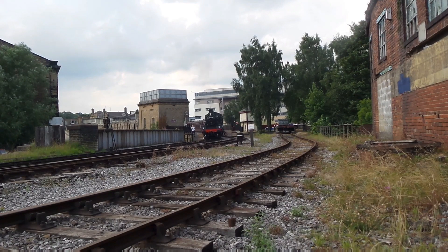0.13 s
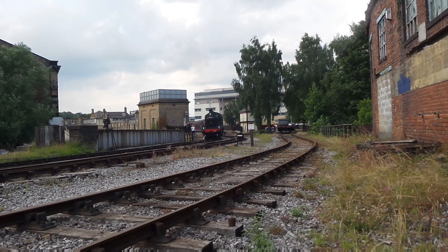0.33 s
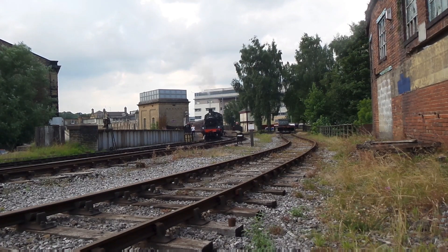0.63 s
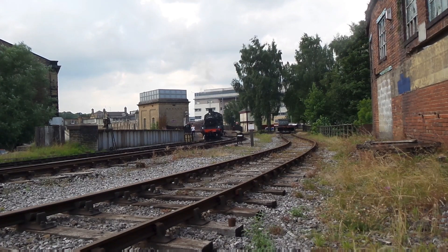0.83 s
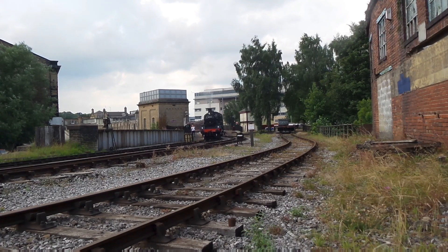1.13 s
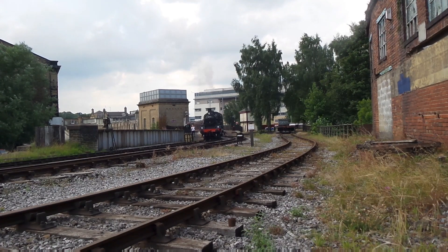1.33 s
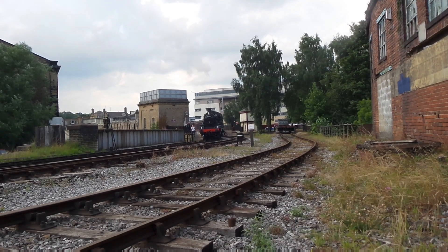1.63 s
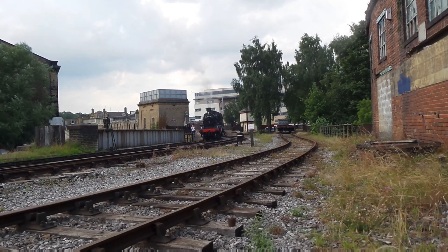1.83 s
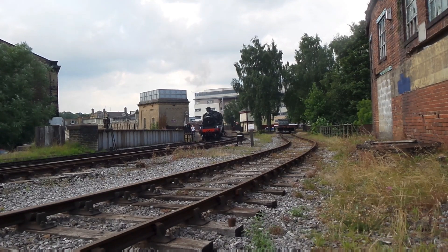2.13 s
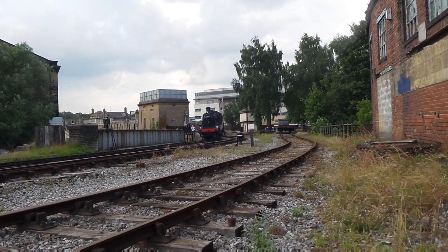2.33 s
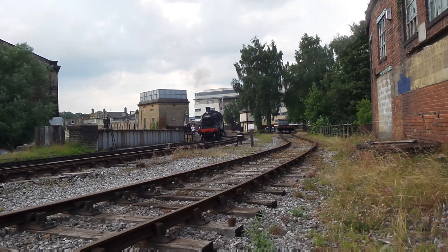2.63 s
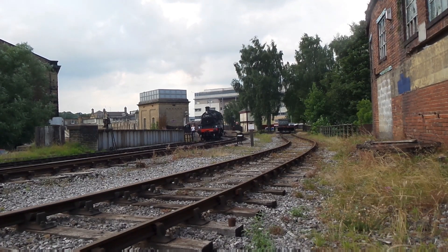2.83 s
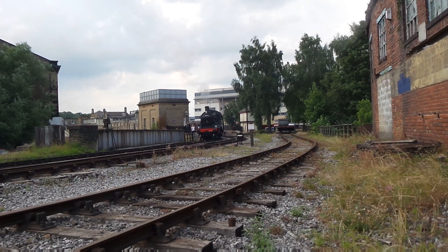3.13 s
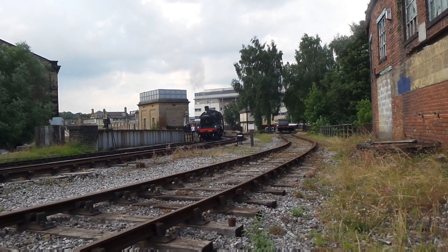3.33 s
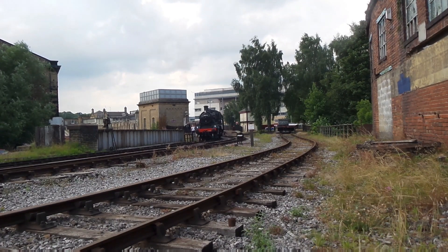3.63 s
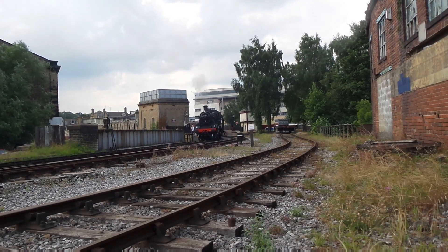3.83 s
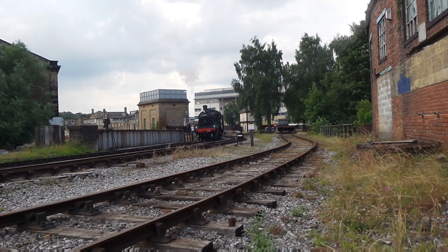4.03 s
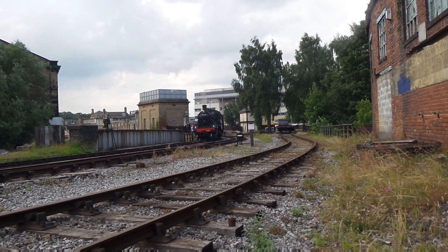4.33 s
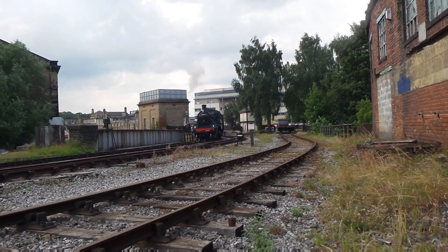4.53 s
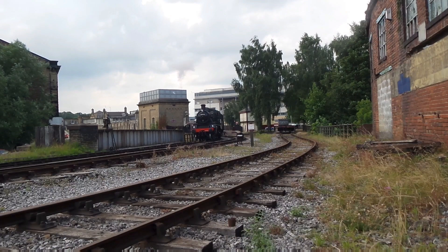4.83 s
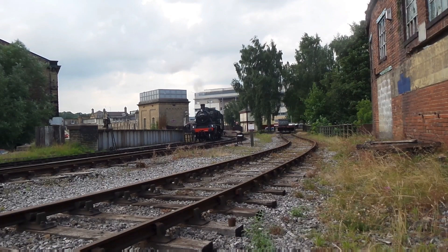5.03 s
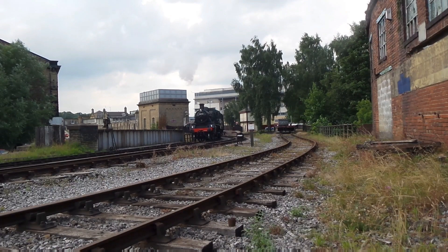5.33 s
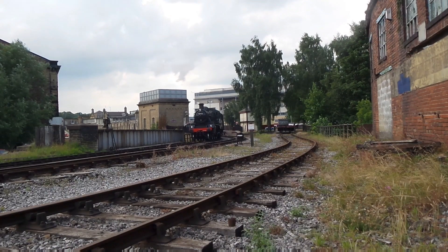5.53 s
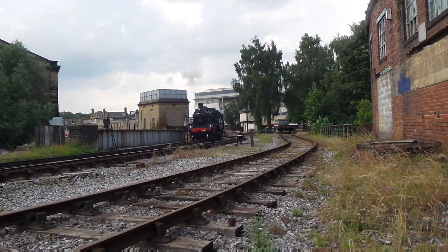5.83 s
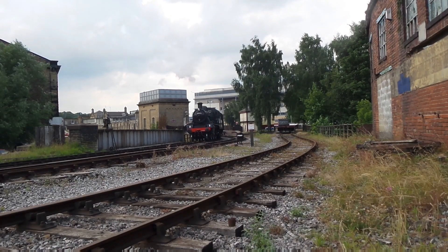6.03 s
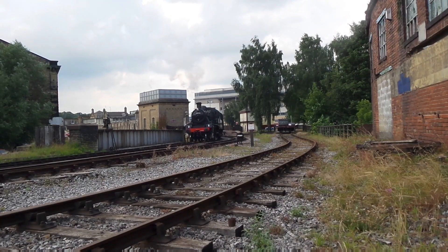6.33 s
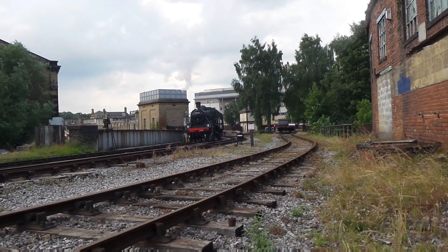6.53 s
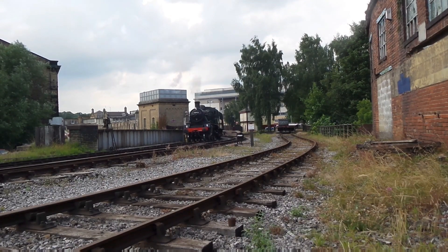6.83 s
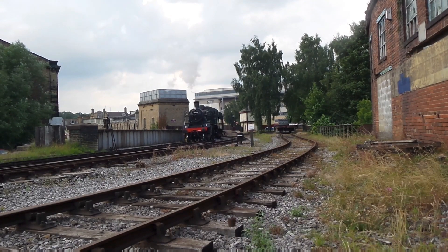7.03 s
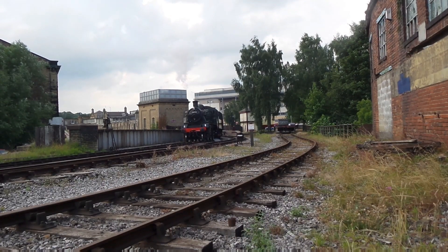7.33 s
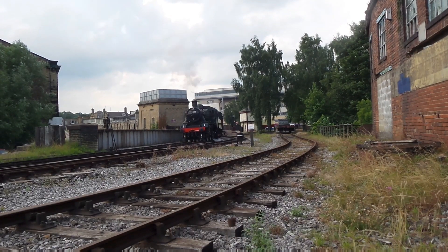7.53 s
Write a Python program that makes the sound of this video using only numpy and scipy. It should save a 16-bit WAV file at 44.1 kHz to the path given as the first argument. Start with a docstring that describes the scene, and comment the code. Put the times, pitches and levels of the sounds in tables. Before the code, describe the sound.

Outdoors, at some distance, a steam engine pulls away with evenly spaced breathy chuffs, slightly faster and louder as it nears. Each beat leaves a diffuse echo. Thin steam hiss grows between them over a faint town murmur, while low wind buffets and bumps the microphone. In the last second or so a harsh steam blast covers the chuffs. The left channel is nearly dead, the right carries everything.

```python
"""A steam locomotive pulls away across a rail yard, over the far murmur of a town and a steady steam leak.
Each exhaust beat starts as a thin honk of wavering tones, then a narrow-noise boom and a broad noise roar;
noise-shaped echoes answer it and the leak, made of coloured noise, swells. The beats slowly quicken.
From the start wind buffets both microphones; single gusts, short low waves, thump the right one from 0.8 s.
At 6.4 s a valve opens into a loud noise jet. The left microphone is almost dead: faint bass, wind and hiss."""
import sys
import numpy as np
from scipy import signal
from scipy.fft import rfft, irfft, next_fast_len
from scipy.io import wavfile
from scipy.ndimage import uniform_filter1d, map_coordinates

SR = 44100
rng = np.random.default_rng(int(sys.argv[2]) if len(sys.argv) > 2 else 0)


def ratio_of_db(decibels):
    """Turn decibels (scalar or array-like) into linear amplitude factors; 0 dB maps to 1."""
    return 10 ** (np.asarray(decibels, float) / 20)


def master_out(mix):
    """Clip the mix to full scale and print it as 16-bit PCM to the path in sys.argv[1]."""
    frames = np.transpose(np.atleast_2d(mix))
    ceiling = np.clip(frames, -1, 1)
    pcm = np.round(ceiling * 32767).astype(np.int16)
    wavfile.write(sys.argv[1], SR, pcm)


N = 339129
TIME = np.arange(N) / SR  # seconds

# All source levels are before the preamplifier gain. Colours are relative: each noise is scaled afterwards.


def unit(x):
    """Scales a sound to rms 1."""
    return x / np.sqrt(np.mean(x ** 2) + 1e-20)


def along(points, hz):
    """Reads a curve of (Hz, value) points on a logarithmic frequency axis."""
    point_hz, value = np.transpose(points)
    return np.interp(np.log(hz + 1), np.log(point_hz + 1), value)


def curves(rows):
    """Draws one curve over time for each column after the seconds."""
    seconds, *columns = np.transpose(rows)
    return [np.interp(TIME, seconds, column) for column in columns]


def wobble(rate):
    """Makes a smooth random curve with the given number of random points a second."""
    points = rng.standard_normal(int(N * rate / SR) + 4)
    return map_coordinates(points, [TIME * rate])


def filtered(x, response):
    """Multiplies the spectrum of x by a gain that depends on frequency."""
    size = next_fast_len(N + SR // 2)  # room for the filter to ring out
    hz = np.fft.rfftfreq(size, 1 / SR)
    return irfft(rfft(x, size) * response(hz), size)[..., :N]


def bands(modes, hz):
    """Adds up the gains of resonances given as (Hz, width in Hz, dB)."""
    return sum(ratio_of_db(db) / (1 + ((hz - centre) / (width / 2)) ** 2) for centre, width, db in modes)


def microphone_port(hz):
    """The small opening before the microphone resonates around 4800 Hz."""
    return 1 + bands([(4800, 1000, 7)], hz)


def rush(colour, patchy_db, modes=(), size=(5, 4)):
    """Turbulent flow: coloured noise in patches of random gain, rung by resonances and the port, at rms 1."""
    grains = signal.stft(rng.standard_normal(N), nperseg=1024)[2]
    # size of a patch: bins of 43 Hz by steps of 12 ms
    patches = uniform_filter1d(rng.standard_normal(grains.shape), size[0], 0)
    patches = uniform_filter1d(patches, size[1], 1)
    noise = signal.istft(grains * ratio_of_db(patchy_db * unit(patches)), nperseg=1024)[1][:N]

    def response(hz):
        return ratio_of_db(along(colour, hz)) * (1 + bands(modes, hz)) * microphone_port(hz)

    return unit(filtered(noise, response))


def hump(peak_s, rise_s, fall_s, power):
    """A swell of gain, 10 dB down rise_s before its peak and fall_s after it."""
    u = (TIME - peak_s) / np.where(TIME < peak_s, rise_s, fall_s)
    return ratio_of_db(np.maximum(-10 * np.abs(u) ** power, -200))


# The exhaust beats. Each row: time of full blast in seconds, roar in dB, boom in dB,
# swell of the leak's hiss in dB, chimney note in Hz.
BEATS = [(.02, -31, -22.5, -36, 184.3), (.695, -31, -24, -35, 180), (1.362, -32, -24.5, -38, 190),
         (2.042, -30.5, -24, -31.5, 190), (2.736, -29, -22.5, -35, 191.4), (3.376, -29, -25, -33.5, 185),
         (4.004, -28.5, -22.5, -34.5, 185), (4.64, -28, -23, -30.5, 191.3),
         (5.273, -26.5, -21.5, -32, 180.5), (5.877, -26, -22, -31, 183.9), (6.466, -29.5, -26.5, -32, 185),
         (7.072, -29.5, -23.5, -47, 173.1), (7.69, -24.5, -23.5, -36, 192.5)]
# Upper resonances of chimney and smokebox. Each row: frequency in Hz, width in Hz,
# gain in the roar in dB, relative strength in the honk in dB.
CHIMNEY = [(340, 45, 4, -14), (420, 45, 3, -16), (560, 55, 4, -14), (650, 45, -3, -7), (820, 40, 1, 0),
           (1015, 45, -1, 2), (1160, 35, -2, -10), (1290, 45, 0, -18), (1600, 60, -2, -6),
           (1750, 45, -1, -11), (1860, 40, -2, -13), (2000, 60, -3, -15), (2220, 50, -3, -16),
           (2400, 60, -1, -17)]


def honks():
    """As the blast valve cracks, a thin puff sounds the chimney's upper resonances as wavering tones."""
    first_honk_db, fade_db_per_s = -36, -0.45  # the honk thins as the engine speeds up
    lead_s = 0.084  # the honk starts this long before the full blast
    margin = SR // 2  # spare samples at both ends
    out, t = np.zeros(N + 2 * margin), TIME[:SR // 4]
    hz, _, _, mode_db = np.transpose(CHIMNEY)[:, :, None]
    swell = (1 - np.exp(-(t / .022) ** 2)) * np.exp(-(t / .08) ** 2)
    for s, *_ in BEATS:
        # each beat has new strengths and slightly new pitches
        strength = ratio_of_db(mode_db + rng.normal(0, 2.4, hz.shape))
        pitch = hz * rng.normal(1, 0.0123)
        phase_waver = np.cumsum(rng.standard_normal((len(hz), len(t))), 1) * .025
        start_phase = rng.random(hz.shape)  # in cycles
        tones = strength * np.sin(2 * np.pi * (pitch * t + start_phase) + phase_waver)
        start = round((s - lead_s) * SR) + margin
        out[start:start + len(t)] += ratio_of_db(first_honk_db + fade_db_per_s * s) * swell * unit(tones.sum(0))
    return out[margin:][:N]


def chimney_note(width_hz, steadiness):
    """The air column sings unsteadily: narrow noise, partly evened out, gliding between the beats' notes."""
    drift = filtered(rng.standard_normal((2, N)), lambda hz: 1 / (1 + (hz / width_hz) ** 2))
    z = drift[0] + 1j * drift[1]
    z = z / (np.abs(z) + 1e-9) ** np.clip(steadiness, 0, 1)
    note_hz = np.interp(TIME, [b[0] for b in BEATS], [b[4] for b in BEATS])
    carrier = np.exp(2j * np.pi * np.cumsum(note_hz) / SR)
    return unit((z * carrier).real)


def boom():
    """Every blast makes the air in the chimney sing one low note, which then dies away."""
    swells = sum(ratio_of_db(db) * hump(s, rise_s=.057, fall_s=.14, power=2.9) for s, _, db, *_ in BEATS)
    return swells * chimney_note(width_hz=24, steadiness=.1)


# Colour of the blast noise before the microphone port. Each row: frequency in Hz, relative level in dB.
ROAR_COLOUR = [(50, -39), (110, -30), (250, 0.5), (480, -6), (700, -4.5), (1400, -7.5), (2400, -9),
               (3200, -10), (4700, -16), (6500, -37.5), (11000, -31), (15500, -56)]


def roar():
    """Steam tears up the chimney as broad noise, peaking a little after the boom."""
    swells = sum(ratio_of_db(db) * hump(s + .027, rise_s=.075, fall_s=.08, power=1.8) for s, db, *_ in BEATS)
    resonances = [mode[:3] for mode in CHIMNEY]
    blast = rush(ROAR_COLOUR, patchy_db=1.8, modes=resonances, size=(2, 6))
    flutter = ratio_of_db(.7 * wobble(35))  # the jet in the chimney tears unevenly
    return swells * flutter * blast


def exhaust():
    """Each beat is a hollow honk, a long boom and a broad roar."""
    return honks() + roar() + boom()


# How long the yard's scattered echo rings. Each row: frequency in Hz, time to die by 60 dB in seconds.
ECHO_T60 = [(150, 0.72), (600, 1.73), (2500, 3.2), (8000, 1.12)]


def echoes(x):
    """Buildings answer: a scattered tail at once, and a smeared, dull slap off a far one."""
    hz, t, z = signal.stft(rng.standard_normal(SR), SR, nperseg=256)
    decay = ratio_of_db(-60 * t / along(ECHO_T60, hz)[:, None])
    tail = signal.istft(z * decay, SR, nperseg=256)[1]
    near = signal.fftconvolve(x, tail / np.linalg.norm(tail))[:N]

    t = TIME[:SR // 2]
    slap = rng.standard_normal(len(t)) * np.exp(-((t - .27) / .03) ** 2)  # arrives around 0.27 s

    def dull(hz):
        less_bass = .5 + 0.52 / (1 + (280 / (hz + 1)) ** 4)
        return less_bass / (1 + (hz / 2200) ** 2)

    far = filtered(signal.fftconvolve(x, slap / np.linalg.norm(slap))[:N], dull)
    return ratio_of_db(-14) * near + ratio_of_db(-14) * far


# The steady leak, mostly growing as it nears. Each row: time in seconds, level in dB.
LEAK = [(0, -44), (.5, -44), (1.3, -44.5), (2.4, -43), (3, -40), (4.3, -41), (5.1, -39.5), (5.65, -37),
        (6.38, -38), (6.42, -45)]
# Colour of the leak. Each row: frequency in Hz, relative level in dB.
LEAK_COLOUR = [(1500, -7.5), (2500, -7.5), (3600, -3.5), (5000, 0.5), (5900, -3.5), (6200, -2), (7000, -7),
               (10000, -15), (15500, -19.5)]
# Whistling gaps. Each row: frequency in Hz, width in Hz, gain in dB.
LEAK_BANDS = [(3630, 71, 6), (4220, 100, 0.5), (4845, 33, 1.5), (5430, 156, 4), (5780, 78, 5.5),
              (7440, 290, -7)]
# Brief flares of the hiss. Each row: time in seconds, level in dB, half length in seconds.
SPURTS = [(.91, -40.5, 0.033), (1.595, -44, 0.05), (3.778, -35, 0.014), (5.69, -37.5, .04)]


def leaking_steam():
    """Steam hisses through gaps and swells with each stroke, while its thin top follows only the steady leak."""
    leak_db, = curves(LEAK)
    leak = rush(LEAK_COLOUR, patchy_db=1.0, modes=LEAK_BANDS, size=(2, 12))
    top = filtered(leak, lambda hz: 1 / (1 + (9000 / (hz + 1)) ** 6))
    # the hiss peaks 25 ms after the full blast
    strokes = sum(ratio_of_db(db) * hump(s + .025, rise_s=.1, fall_s=.12, power=1.14) for s, _, _, db, _ in BEATS)
    spurts = sum(ratio_of_db(db) * hump(s, half, half, power=2) for s, db, half in SPURTS)
    waver_db = .9 * wobble(12)
    flow = np.sqrt(ratio_of_db(leak_db + waver_db) ** 2 + strokes ** 2 + spurts ** 2)
    return flow * (leak - top) + ratio_of_db(leak_db - 0.2) * top


# Colour of the far town. Each row: frequency in Hz, relative level in dB.
TOWN_COLOUR = [(150, 2), (300, 13), (600, 3), (1050, 5), (1300, -8), (2500, -2), (6000, -22), (10000, -28),
               (15500, -58)]


def town_murmur():
    """Many far sounds of the town blur into a quiet, steady noise."""
    return ratio_of_db(-50.5) * rush(TOWN_COLOUR, patchy_db=1.5, size=(2, 12))


# Buffeting on the right microphone. Each row: time in seconds, level in dB.
RIGHT_WIND = [(0, -40), (.28, -50), (.4, -38), (.65, -43), (.92, -37.5), (1.07, -48), (1.43, -42),
              (1.8, -46.5), (2.15, -34.5), (2.27, -49), (2.46, -40.5), (2.9, -43), (3.06, -33), (3.21, -44),
              (3.43, -33.5), (3.62, -49), (3.78, -32), (4.13, -43), (5.4, -44), (5.95, -48), (6.49, -46),
              (6.8, -48), (7.3, -54.5), (7.69, -48)]
# Colour of the right buffeting. Each row: frequency in Hz, relative level in dB.
RIGHT_BUFFET = [(20, -50), (35, -23), (60, -6), (95, -1), (200, -9.5), (320, -21), (600, -66)]
# Buffeting on the left microphone. Each row: time in seconds, level in dB.
LEFT_WIND = [(0, -73), (.6, -63), (.95, -70), (1.6, -69), (2.7, -69), (3.7, -66), (5, -72), (6.1, -75),
             (7.05, -83), (7.69, -77)]
# Colour of the left buffeting. Each row: frequency in Hz, relative level in dB.
LEFT_BUFFET = [(10, 7), (80, 16), (150, 9), (300, 1), (700, -13), (2000, -18), (6000, -45)]


def buffeting():
    """Wind swirls at each microphone port on its own, as lumpy low noise unrelated left to right."""
    (right_db,), (left_db,) = curves(RIGHT_WIND), curves(LEFT_WIND)
    right_lumps = ratio_of_db(3.2 * wobble(26))
    left_lumps = ratio_of_db(3.3 * wobble(27) + 1.1 * wobble(4.7))
    right = ratio_of_db(right_db) * unit(right_lumps * rush(RIGHT_BUFFET, patchy_db=1.0))
    left = ratio_of_db(left_db) * unit(left_lumps * rush(LEFT_BUFFET, patchy_db=-6.0))
    return left, right


# Single gusts on the right microphone. Each row: time in seconds, peak of the swell in dB, frequency in Hz.
THUMPS = [(0.787, -21, 115), (.935, -17.5, 146), (1.57, -28.5, 110), (2.273, -25, 132), (3.01, -29, 109),
          (3.055, -20.5, 96), (3.46, -24, 92), (3.763, -20.5, 117), (3.782, -24, 120), (3.807, -20.5, 195),
          (3.831, -22, 282), (3.84, -16, 132), (3.942, -27, 111), (5.42, -26, 90.5), (5.801, -28.5, 101)]


def gust_thumps():
    """A single gust pushes the right microphone to and fro for about one cycle."""
    out = np.zeros(N)
    for s, db, hz in THUMPS:
        cycles = hz * (TIME - s)
        swell = np.exp(-(cycles / 0.67) ** 2)  # half length 0.67 of a cycle
        phase = rng.uniform(0, 2 * np.pi)
        out += ratio_of_db(db) * swell * np.sin(2 * np.pi * cycles + phase)
    return out


# The open valve. Each row: time in seconds, level in dB, sizzle in dB relative to the jet.
JET = [(6.37, -33, -12), (6.414, -25.5, -17.5), (6.585, -22, -15), (6.674, -23, -20.5), (6.9, -22.5, -19.5),
       (7.3, -25, -15), (7.35, -23, -15.5), (7.6, -24, -15), (7.69, -26, -15)]
# Colour of the jet's body. Each row: frequency in Hz, relative level in dB.
JET_COLOUR = [(700, -19), (1200, -18.5), (1800, -9.5), (3200, -4), (4700, 2.5), (6400, -2), (9000, -17.5),
              (12000, -40)]
# Colour of the sizzle on top of the jet. Each row: frequency in Hz, relative level in dB.
SIZZLE = [(5000, -20), (8000, 0), (11000, -7), (15500, -12)]


def valve_jet():
    """A valve opens and steam bursts out as loud bright noise with a sizzle on top."""
    valve_s, opening_s = 6.375, 0.016
    jet_db, sizzle_db = curves(JET)
    opened = np.clip((TIME - valve_s) / opening_s, 0, 1)
    body = rush(JET_COLOUR, patchy_db=1.5, size=(3, 8))
    sizzle = ratio_of_db(sizzle_db) * rush(SIZZLE, patchy_db=2.3)
    return opened * ratio_of_db(jet_db) * (body + sizzle)


def left_leak(hz):
    """The dead left microphone passes a very faint copy of everything, minus a bass copy 1 ms late."""
    late_bass = np.exp(2j * np.pi * hz * -.001) / (1 + (hz / 230) ** 4)
    return ratio_of_db(-62.0) - ratio_of_db(-38.5) * late_bass


def scene():
    """The right microphone hears everything; the left gets only a faint leak of it and its own wind."""
    beats = exhaust()
    heard = beats + echoes(beats) + leaking_steam() + town_murmur() + valve_jet()
    left_wind, right_wind = buffeting()
    left = filtered(heard, left_leak) + left_wind
    right = heard + right_wind + gust_thumps()
    return np.array([left, right])


def low_pass(x):
    """Removes everything above the highest recorded frequency."""
    return signal.sosfilt(signal.butter(12, 15750, fs=SR, output="sos"), x)


def record(dry):
    """The preamplifier adds gain, its own hiss (stronger low down) and a small constant offset."""
    white = rng.standard_normal(dry.shape)
    hiss = ratio_of_db(-72.0) * filtered(white, lambda hz: 1 + 700 / (hz + 300))
    mix = ratio_of_db(6.5) * dry + hiss - .0003
    return low_pass(mix)


dry = scene()
out = record(dry)
master_out(out)
```